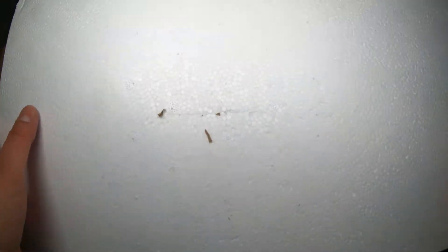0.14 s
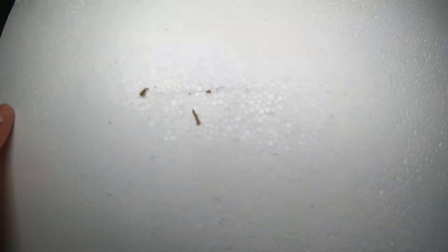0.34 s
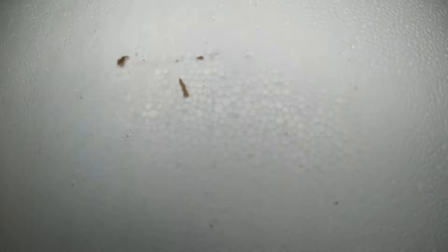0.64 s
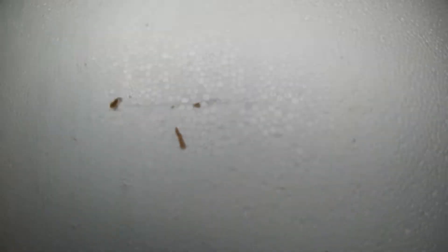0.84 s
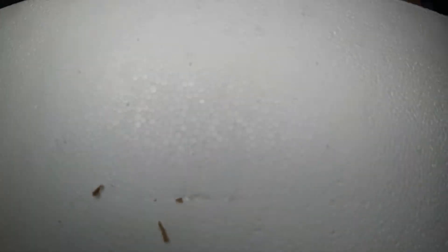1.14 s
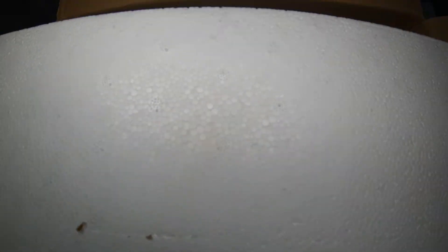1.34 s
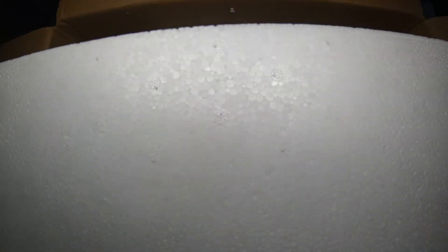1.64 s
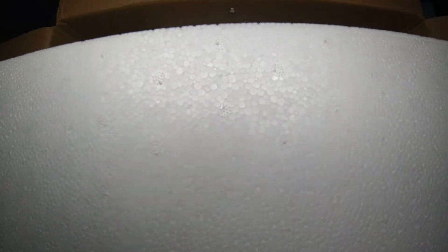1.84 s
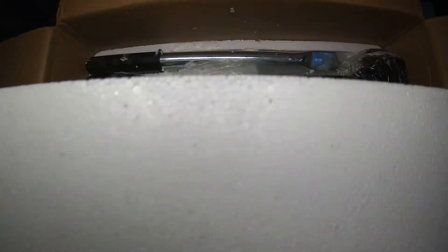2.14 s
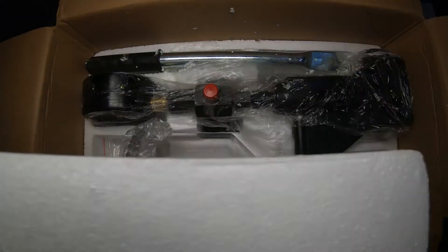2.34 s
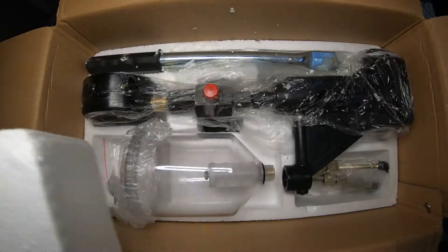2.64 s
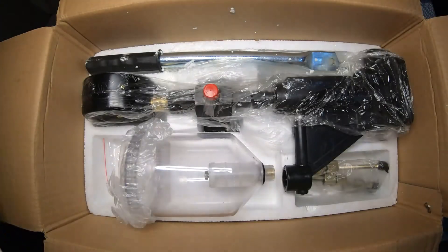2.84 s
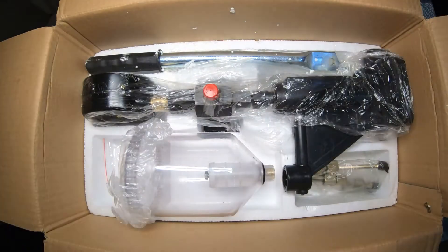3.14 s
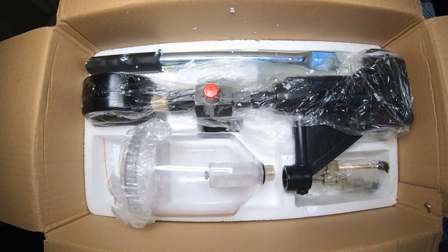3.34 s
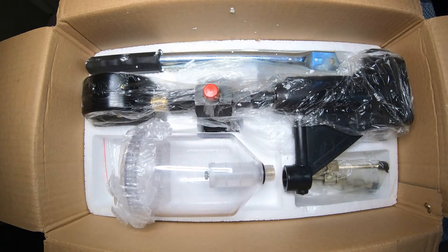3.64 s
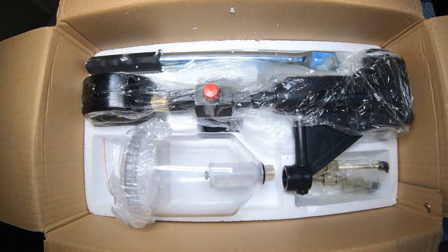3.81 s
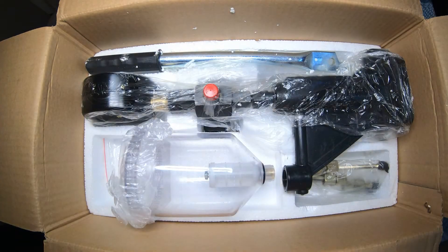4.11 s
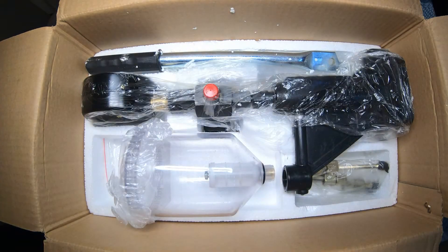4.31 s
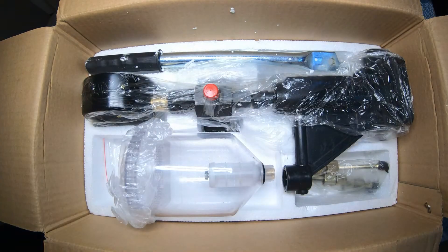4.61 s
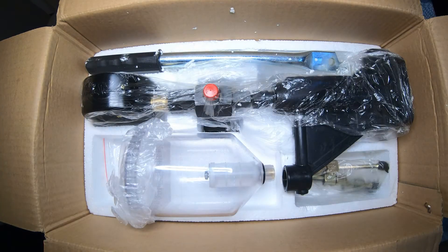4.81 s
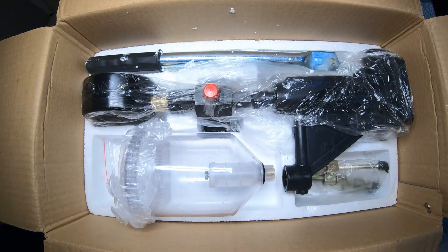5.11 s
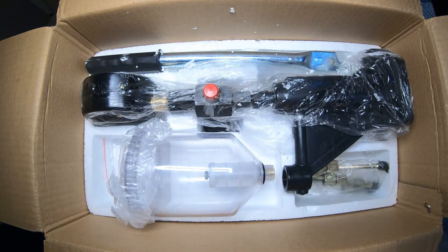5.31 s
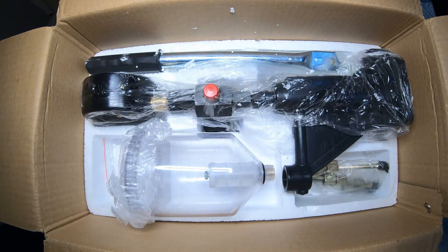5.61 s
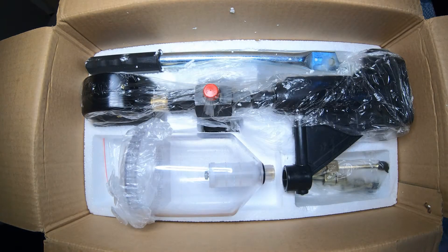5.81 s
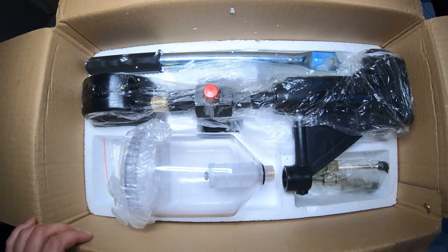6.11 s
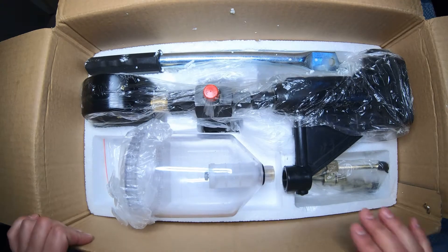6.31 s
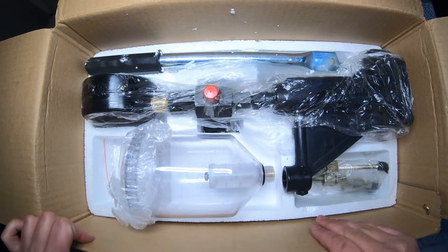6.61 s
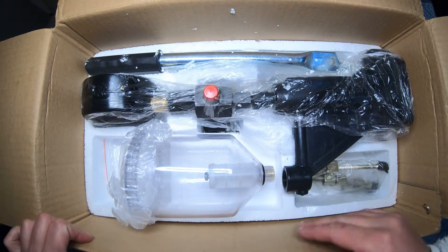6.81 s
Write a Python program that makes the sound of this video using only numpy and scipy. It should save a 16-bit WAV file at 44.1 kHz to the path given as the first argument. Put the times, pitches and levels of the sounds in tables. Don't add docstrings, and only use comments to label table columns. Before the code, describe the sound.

A foam slab squeaks and scrapes out of a cardboard box in crunchy jerks, then slides and bumps into place with hollow box knocks.

```python
import sys
import numpy as np
from scipy import signal
from scipy.fft import rfft, irfft, next_fast_len
from scipy.io import wavfile
from scipy.ndimage import uniform_filter1d, map_coordinates

SR = 44100
rng = np.random.default_rng(int(sys.argv[2]) if len(sys.argv) > 2 else 0)


def generate_wav(sig):
    pcm = np.round(np.clip(np.atleast_2d(sig).T, -1, 1) * 32767).astype(np.int16)
    wavfile.write(sys.argv[1], SR, pcm)


def nominal_scale(level):
    x = np.asarray(level, float) / 20
    return 10 ** x


N = 306495

# (fastest at [s], bead scrape level [dB], swell [s], fade [s], fizz over scrape [dB])
PULLS = [(0, -23, .1, 0.5, -2.5), (0.368, -30, 0.093, 0.1, -3), (0.519, -27, 0.093, 0.057, 4.5),
         (.76, -32.5, 0.92, 0.092, -2), (1.089, -53.5, 0.082, 0.044, -45), (1.154, -40.5, 0.069, 0.088, 1),
         (1.28, -45.5, 0.047, 0.053, -6.5), (1.41, -53, 0.12, .05, -1), (1.473, -31, 0.047, 0.17, -5.5),
         (1.576, -28.5, 0.013, 0.14, -3), (1.657, -22, 0.083, 0.084, -1), (1.756, -31, 0.036, 0.029, 2),
         (2.033, -26, 0.31, 0.14, -1), (2.284, -44, 0.025, 0.012, 4.5), (2.35, -36, 0.021, 0.074, 9.5),
         (2.47, -29, 0.12, 0.13, 2.5), (2.623, -41, 0.012, 0.028, 14), (2.728, -40, 0.069, 0.067, 2.5)]
SLIDES = [(2.984, -40.5, 0.1, 0.06, -6.5), (3.092, -35, 0.077, 0.12, 1), (3.188, -37, 0.049, 0.11, 4),
          (3.29, -34.5, 0.087, 0.39, -3), (3.424, -33, 0.14, 0.35, 6), (3.638, -35, 0.14, 0.29, 15),
          (3.82, -32.5, 0.15, 0.69, -8), (4.085, -29, 0.34, 0.088, 4), (4.224, -36, 0.013, 0.14, 2.5),
          (4.55, -39, 1, 0.39, -8), (4.802, -36, 0.87, 0.24, 1), (4.99, -36.5, 0.017, 0.34, -1.5),
          (5.18, -38.5, 0.24, 0.11, 0.5), (5.31, -29, 0.027, 0.14, -1), (5.52, -46.5, 0.45, 0.15, -11),
          (6.145, -35.5, 0.11, 0.23, 3), (6.3, -49.5, 0.13, 0.31, -13), (6.582, -40.5, 0.13, 0.15, 0.5),
          (6.841, -34.5, 0.055, 0.18, -1)]
STROKE_ROUND, REST_DB = 1.268, -65.5
# (time [s], board over scrape [dB])
BEARING = [(0, -17.5), (.28, -6), (.5, -12), (.8, -4.5), (1.15, -9), (1.35, -0.5), (1.55, 2.5), (1.7, -4),
           (2.35, -6), (2.62, -3.5), (2.95, 3.5), (3.2, 0), (3.64, -4), (4.0, -2.5), (4.35, -0.5),
           (5.2, -4.5), (6.0, -1), (6.95, -3)]
# (time [s], left over right [dB])
PLACE = [(0.0, 0.5), (0.95, 0.5), (0.99, 1.5), (1.72, 1.0), (2.73, 3), (2.9, -5), (3.72, 3.5), (5.4, 2),
         (5.65, -3.5), (5.98, 1), (6.95, 1.5)]
# (time [s], bead level [dB], board over bead [dB], hold [s])
TUGS = [(.451, -27, -8, 0.024), (.59, -23, -10.5, 0.019), (.647, -23.5, -12, 0.014),
        (.688, -32.5, -5.5, 0.027), (.773, -26.5, -22, 0.018), (.797, -33, -5.5, 0.009),
        (1.231, -37.5, -11, 0.0074), (1.4165, -33, 5, 0.0049), (1.4425, -20.5, -22, 0.012),
        (1.943, -22, -9.5, 0.033), (2.03, -35, 6, 0.0045), (2.113, -27, -19, 0.016),
        (2.135, -27.5, -22, 0.025), (2.174, -31, -17, 0.017), (2.265, -35.5, -28, 0.0072),
        (2.3203, -32, -29, 0.015), (2.3371, -32, -26, .002), (2.329, -35, -20, .002),
        (2.3585, -29.5, -20, .003), (2.3805, -21, -10, 0.003), (2.389, -22, -14, .002),
        (2.3955, -20, -13, .002), (2.407, -26, -16, .002), (2.415, -26.5, -11, 0.011),
        (2.445, -26, -16, 0.0028), (2.482, -29, -12, .002), (2.491, -27, 0.5, 0.0078),
        (2.536, -25, -5, 0.01), (2.567, -22, -4.5, 0.0046), (2.6236, -32, -20, .001),
        (2.6407, -30.5, -13, 0.0044), (2.6802, -26.5, -9, 0.019), (2.706, -22, -1, 0.002)]
BUMPS = [(2.8824, -29, 8.5, 0.0028), (2.9144, -20, 0.5, 0.0016), (2.9414, -21, -1, 0.0016),
         (2.9627, -29, 4, 0.0032), (3.087, -32.5, -7.5, 0.024), (3.414, -25, -2, 0.0099),
         (3.459, -20, 4, 0.0037), (3.5052, -23.5, 10.5, 0.0021), (3.656, -38.5, 13, 0.0064),
         (3.744, -29.5, 6.5, 0.0022), (4.008, -22.5, -11, 0.0035), (4.162, -31, 4, 0.0095),
         (4.2155, -31.5, -16, 0.017), (4.249, -29, -6, .004), (4.987, -38, -25, 0.0074),
         (5.2854, -26, 3, 0.013), (5.469, -34.5, -7, 0.0042), (6.0264, -38, 19, 0.0019),
         (6.108, -44.5, 18, 0.0036), (6.233, -33, -2, 0.0085), (6.2523, -28, 0, 0.005),
         (6.52, -36, -0.5, 0.0057), (6.7166, -39.5, -24, 0.0018), (6.8215, -32, -23, 0.0055)]
LET_GO_S, TUG_LINGER, BUMP_LINGER = 0.021, 1.8, 5.5

# (frequency [Hz], density [dB per Hz])
BEAD_SPECTRUM = [(880, -21), (1500, -9.5), (1940, -4.5), (2450, -2.5), (2730, -2.5), (3090, 0), (3670, 0.5),
                 (7000, -4), (9100, -38), (15400, -120)]
# (frequency [Hz], density [dB per Hz])
FIZZ_SPECTRUM = [(2650, -14.5), (4500, -2.5), (5130, -9.5), (5880, -5), (7980, 3.5), (9340, -3),
                 (10200, -0.5), (10900, -4), (13200, -10.5), (15800, -26)]
# (frequency [Hz], density [dB per Hz])
BOARD_SPECTRUM = [(220, -30), (380, -2), (488, -0.5), (636, 0), (1480, 0), (2600, -8), (3380, -9.5),
                  (5720, -120)]
# (frequency [Hz], left-right coherence [0..1])
ALIKE = [(60, 0.96), (180, 0.86), (550, 0.75), (1300, 0.14), (2800, 0.83), (6000, 0.28), (11000, 0)]

# (time [s], walls flexing [dB], panels humming [dB], fade [s])
HEAVES = [(0, -28, -33, 0.22), (.45, -47.5, -41.5, 0.35), (.64, -32.5, -39, 0.099), (.79, -48, -46, 0.07),
          (1.235, -63, -54.5, .15), (1.457, -28.5, -33.5, 0.51), (2.04, -48, -43, 0.11),
          (2.146, -35, -45, 0.043), (2.272, -45, -60, .05), (2.345, -35.5, -45, 0.22),
          (2.49, -31, -41, 0.13), (2.69, -49.5, -43.5, 0.072), (2.953, -67, -36, 0.037),
          (3.116, -63, -41.5, 0.17), (3.425, -38, -35, 0.13), (3.78, -78, -44, 0.52),
          (4.014, -73, -42, 0.088), (4.658, -60, -46, 0.19), (4.91, -58, -32, 0.15),
          (5.312, -30, -32.5, 0.11), (5.364, -30, -34.5, 0.1), (5.6, -56, -48.5, 0.1),
          (6.04, -42, -46.5, 0.067), (6.118, -35, -47, 0.16), (6.262, -43, -33, 0.096),
          (6.535, -34.5, -50.5, 0.17), (6.835, -46, -41, 0.2)]
HEAVE_SWELL_S, WALLS_REST_DB, HUM_REST_DB = 0.037, -74.5, -62
# (frequency [Hz], density [dB per Hz])
WALL_SPECTRUM = [(12, -41.5), (20, -11), (60, -2.5), (115, -5.5), (150, -16.5), (250, -120)]
# (frequency [Hz], density [dB per Hz])
HUM_SPECTRUM = [(105, -39), (147, -3.5), (200, -2.5), (270, -4.5), (330, -6), (420, -10), (560, -45)]
# (time [s], peak level [dB], centre frequency [Hz], t60 [s])
KNOCKS = [(.012, -10, 71, 0.12), (0.636, -20, 65, 0.082), (1.459, -9, 75, 0.11), (1.634, -19, 70, 0.15),
          (1.462, -22, 171, 0.057), (1.629, -6, 199, 0.083), (2.037, -8.5, 201, 0.081),
          (2.324, -22.5, 144, 0.098), (2.401, -21, 143, 0.19), (3.42, -13, 75, 0.055),
          (3.466, -15, 136, 0.052), (3.508, -13.5, 249, 0.092), (3.658, -24, 566, 0.11),
          (3.746, -25, 500, 0.12), (4.011, -15.5, 547, 0.086), (4.216, -18.5, 497, 0.073),
          (4.9, -6, 156, 0.22), (4.899, -14.5, 560, 0.37), (5.285, -18, 296, 0.065), (5.365, -9, 99, 0.038),
          (5.399, -18.5, 690, 0.19), (6.028, -17.5, 480, 0.098), (6.042, -14, 75, 0.086),
          (6.107, -21, 400, 0.095), (6.109, -17, 80, 0.086), (6.256, -6.5, 380, 0.14),
          (6.525, -20.5, 63.5, 0.11), (6.546, -20, 550, 0.052)]
# (frequency [Hz], strength [dB])
PANEL_MODES = [(58, 4), (92, 2.5), (147, 6.5), (190, -2), (268, -2), (310, 0.5), (393, 0.5), (510, 0),
               (545, -3.5), (690, -2), (810, -3.5), (1060, -6.5), (1330, -10.5)]

# (time [s], start frequency [Hz], end frequency [Hz], length [s], level [dB])
RUSTLES = [(.011, 3600, 2790, 0.023, -24.5), (.113, 3500, 3520, .01, -25), (1.44, 2124, 2080, 0.038, -31),
           (1.444, 1730, 1660, 0.016, -29.5), (1.495, 1254, 1320, .04, -34),
           (1.508, 2410, 2370, 0.021, -29.5), (1.56, 2400, 2410, 0.069, -34),
           (1.578, 1205, 1490, 0.047, -31), (1.638, 2350, 2730, 0.07, -35), (2.385, 2790, 3080, .018, -30),
           (2.43, 4750, 4100, 0.11, -33), (2.619, 8200, 8200, .007, -27), (2.62, 10400, 10400, 0.0077, -25),
           (3.079, 582, 570, 0.058, -37), (3.085, 1012, 1013, 0.042, -38), (3.267, 586, 584, 0.033, -38.5),
           (3.583, 5430, 5450, 0.068, -35), (3.862, 397, 386, .04, -38.5), (3.953, 1150, 1150, 0.022, -38),
           (4.049, 1050, 921, 0.089, -35.5), (4.085, 1055, 752, 0.046, -30),
           (4.125, 1190, 1210, .055, -35.5), (4.134, 453, 740, 0.049, -35.5), (4.241, 697, 616, .03, -40),
           (5.4, 717, 690, 0.067, -44)]
# (time [s], frequency [Hz], length [s], level [dB])
CHIRPS = [(0.511, 2250, 0.03, -36), (0.594, 4570, 0.0091, -24), (0.599, 1600, 0.0077, -26.5),
          (0.597, 2430, 0.022, -25.5), (0.646, 1810, 0.018, -25), (0.653, 2375, 0.02, -26),
          (1.62, 3080, 0.073, -32), (2.336, 2880, 0.0092, -27), (2.468, 1374, 0.026, -38),
          (2.529, 3770, 0.017, -31.5), (2.563, 4540, 0.0093, -29), (2.567, 1410, 0.05, -42),
          (4.207, 674, 0.05, -36), (6.248, 1615, 0.013, -30.5)]
CHIRP_DRIFT, RUSTLE_DRIFT = 0.038, 0.0697
# (time [s], frequency [Hz], level [dB])
SQUEAL = [
    (.036, 3260, -41),
    (.045, 3420, -21.5),
    (.058, 4150, -18.5),
    (.075, 4950, -27.5),
    (.12, 5120, -17.5),
    (.127, 4500, -16),
    (.143, 4480, -17),
    (.15, 5100, -15),
    (.226, 5390, -39),
]
SKIPS_S = (.053, .0625, .068, .0755, .087, .1, .119, .1465)
SKIP_WIDTH_S, SKIP_DB = 0.0017, -6
SHARP_S, SHARP_WIDTH_S, SHARP_DB = 0.174, 0.022, -10.5
PLAIN_DB = -28

# (frequency [Hz], density [dB per Hz])
BRUSH_SPECTRUM = [(3200, -33), (3900, -1), (5000, 0), (6000, -40)]
BRUSH_S, BRUSH_DB, BRUSH_WIDTH_S = 0.95, -56.5, .2
# (time [s], frequency [Hz], length [s], level [dB])
THUMPS = [
    (1.462, 110, 0.012, -17),
    (1.493, 110, 0.015, -29),
    (1.541, 110, 0.012, -24),
    (1.629, 119, 0.011, -21),
    (4.908, 151, 0.029, -21.5),
    (5.284, 289, 0.022, -24),
    (5.363, 190, .014, -25.5),
    (5.429, 80, 0.022, -35),
    (5.505, 170, 0.057, -47),
    (5.572, 148, 0.063, -49.5),
]
# (frequency [Hz], density [dB per Hz])
HUSH_SPECTRUM = [(15, -18), (25, -26), (69, -22.5), (91, -24), (188, -7), (457, -11), (762, 11.5),
                 (1050, -52), (2230, -1), (5880, -23), (7700, -15), (15500, -33)]
HUSH_DB = -66.5
# (frequency [Hz], t60 [s])
ROOM_T60 = [(200, 0.17), (2000, 0.33), (10000, 0.014)]
TOP_HZ = 15950


def unit(x):
    return x / np.sqrt(np.mean(x ** 2) + 1e-20)


def along(points, hz):
    f, v = np.transpose(points)
    return np.interp(np.log(hz + 1), np.log(f + 1), v)


def curves(rows):
    s, *cols = np.transpose(rows)
    return [np.interp(np.arange(N) / SR, s, c) for c in cols]


def wobble(rate):
    knots = rng.standard_normal(int(N * rate / SR) + 4)
    return map_coordinates(knots, [np.arange(N) * rate / SR])


def sides(pan_db):
    return nominal_scale(np.multiply.outer([.5, -.5], pan_db))


def swells(at, db, swell, fade, shape):
    t = np.arange(0, N + 64, 64) / SR
    away = np.maximum((at - t) / swell, (t - at) / fade)
    return nominal_scale(db - 20 * away ** shape) ** 2


def summed_db(powers, rest_db):
    total_db = 10 * np.log10(powers.sum(axis=0) + nominal_scale(rest_db) ** 2)
    return np.interp(np.arange(N), 64 * np.arange(len(total_db)), total_db)


def rush(spectrum, spiky_db, patchy_db):
    slips = rng.standard_normal((2, N)) * nominal_scale(spiky_db * wobble(900))
    _, _, z = signal.stft(slips, SR, nperseg=512)
    patches = uniform_filter1d(rng.standard_normal(z.shape[1:]), 3, 0)
    patches = uniform_filter1d(patches, 5, 1)
    pair = signal.istft(z * nominal_scale(patchy_db * unit(patches)), nperseg=512)[1][:, :N]
    size = next_fast_len(N + SR // 10, True)
    hz = np.fft.rfftfreq(size, 1 / SR)
    gain = nominal_scale(along(spectrum, hz)) * np.minimum(hz / spectrum[0][0], 1) ** 6
    turn = np.arccos(np.clip(along(ALIKE, hz), 0, 1)) / 2
    mid, side = irfft(rfft(pair, size) * gain * [np.cos(turn), np.sin(turn)], size)[:, :N]
    return unit(np.array([mid + side, mid - side]))


def drag():
    at, db, swell, fade, fizz_db = np.transpose(PULLS + SLIDES)[..., None]
    powers = swells(at, db, swell, fade, STROKE_ROUND)
    scrape_db = summed_db(powers, REST_DB)
    fizz_over_db = summed_db(powers * nominal_scale(fizz_db) ** 2, REST_DB) - scrape_db
    return scrape_db, fizz_over_db, curves(BEARING)[0]


def jerks():
    beads, board = np.zeros(N + SR), np.zeros(N + SR)
    t = np.arange(SR // 4) / SR
    for rows, linger in ((TUGS, TUG_LINGER), (BUMPS, BUMP_LINGER)):
        for s, db, board_db, hold in rows:
            start = round(s * SR)
            fall_db = -60 * np.maximum(t - hold, 0) / (LET_GO_S + linger * hold)
            beads[start:][:len(t)] += nominal_scale(db - 1.5 + fall_db) * (1 - np.exp(-t / 0.0012))
            board[start:][:len(t)] += nominal_scale(db + board_db + 1.3 * fall_db) * (1 - np.exp(-t / 0.0036))
    return beads[:N], board[:N]


def rubbing():
    scrape_db, fizz_db, board_db = drag()
    pan_db = curves(PLACE)[0] + 1.24 * wobble(16)
    grip_db = 1.1 * wobble(30) + 1.14 * wobble(80)
    jerk, jerk_board = jerks()
    beads = np.hypot(nominal_scale(scrape_db + grip_db), jerk) * sides(pan_db)
    board_level_db = scrape_db + board_db + 0.14 * grip_db + 0.94 * wobble(30)
    board = np.hypot(nominal_scale(board_level_db), jerk_board) * sides(0.79 * pan_db)
    return (beads * rush(BEAD_SPECTRUM, spiky_db=1.0, patchy_db=2.0)
            + beads * nominal_scale(fizz_db) * rush(FIZZ_SPECTRUM, spiky_db=0.5, patchy_db=3.0)
            + board * rush(BOARD_SPECTRUM, spiky_db=1.5, patchy_db=3.5))


def handling():
    at, walls_db, hum_db, fade = np.transpose(HEAVES)[..., None]
    walls_db = summed_db(swells(at, walls_db, HEAVE_SWELL_S, fade, 0.98), WALLS_REST_DB)
    hum_db = summed_db(swells(at, hum_db, HEAVE_SWELL_S, 1.57 * fade, 0.83), HUM_REST_DB)
    walls = unit(nominal_scale(0.86 * wobble(13)) * rush(WALL_SPECTRUM, spiky_db=0.5, patchy_db=2.5))
    hum = unit(nominal_scale(2.5 * wobble(25)) * rush(HUM_SPECTRUM, spiky_db=0, patchy_db=0))
    low = nominal_scale(walls_db) * walls + nominal_scale(hum_db) * hum
    return 0.82 * low + 0.4 * low[::-1]


def knocks():
    out = np.zeros(N + SR)
    t = np.arange(SR // 2) / SR
    modes, strength_db = np.transpose(PANEL_MODES)[..., None]
    for s, db, hz, t60 in KNOCKS:
        scatter_db, detune = rng.standard_normal((2, len(PANEL_MODES), 1)) * [[[1.5]], [[0.042]]]
        octaves = np.log2(modes / hz)
        off_pitch_db = np.maximum(6.1 * octaves, -15 * octaves)
        decay_db = 60 * t * (modes / 150) ** .5 / t60
        level_db = db + strength_db - off_pitch_db + scatter_db - decay_db
        swing = 1 - np.exp(-t * modes / 0.47)
        ring = swing * nominal_scale(level_db) * np.sin(2 * np.pi * modes * (1 + detune) * t)
        out[round(s * SR):][:len(t)] += nominal_scale(-8.5) * ring.sum(axis=0)
    return out[:N]


def chirps():
    out = np.zeros(N + SR)
    rough, drift = nominal_scale(3.2 * wobble(300)), wobble(250)
    tones = [(s, hz, hz, length, db, CHIRP_DRIFT) for s, hz, length, db in CHIRPS]
    tones += [(*row, RUSTLE_DRIFT) for row in RUSTLES]
    for s, hz, end_hz, length, db, scatter in tones:
        at = slice(round(s * SR), round((s + length) * SR))
        glide_hz = np.linspace(hz, end_hz, at.stop - at.start) * (1 + scatter * drift[at])
        phase = 2 * np.pi * np.cumsum(glide_hz) / SR
        swell = np.hanning(len(phase)) ** .5
        out[at] += np.sqrt(2) * nominal_scale(db) * rough[at] * swell * np.sin(phase)
    return out[:N]


def squeal():
    hz, db = curves(SQUEAL)
    t = np.arange(N) / SR
    skips_db = sum(SKIP_DB * np.exp(-((t - s) / SKIP_WIDTH_S) ** 2) for s in SKIPS_S)
    level_db = db + skips_db + 1.5 * wobble(356)
    phase = 2 * np.pi * np.cumsum(hz * (1 + 0.011 * wobble(491))) / SR
    octave = nominal_scale(PLAIN_DB) + nominal_scale(SHARP_DB - 20 * ((t - SHARP_S) / SHARP_WIDTH_S) ** 6)
    on = (t > SQUEAL[0][0]) & (t < SQUEAL[-1][0])
    return on * np.sqrt(2) * nominal_scale(level_db) * (np.sin(phase) + octave * np.sin(2 * phase))


def brush():
    power = swells(BRUSH_S, BRUSH_DB, BRUSH_WIDTH_S, BRUSH_WIDTH_S, 4)
    return nominal_scale(summed_db(power[None], -120)) * rush(BRUSH_SPECTRUM, spiky_db=1, patchy_db=2)


def thumps():
    out = np.zeros(N + SR)
    for s, hz, length, db in THUMPS:
        t = np.arange(round(length * SR)) / SR
        swell = np.hanning(len(t)) ** .5
        out[round(s * SR):][:len(t)] += np.sqrt(2) * nominal_scale(db) * swell * np.sin(2 * np.pi * hz * t)
    return out[:N]


def room(x):
    hz, t, z = signal.stft(rng.standard_normal((2, SR // 2)), SR, nperseg=256)
    decay = nominal_scale(-60 * t / along(ROOM_T60, hz)[:, None])
    tail = signal.istft(z * decay, SR, nperseg=256)[1]
    return signal.fftconvolve(x, tail / np.linalg.norm(tail[0]), axes=1)[:, :N]


def scene():
    tones = sides(1.2)[:, None] * squeal() + sides(2.1)[:, None] * chirps()
    near = rubbing() + tones + handling() + knocks() + thumps()
    echo = nominal_scale(-14.5) * room(near)
    hush = nominal_scale(HUSH_DB - 1.5) * rush(HUSH_SPECTRUM, spiky_db=0, patchy_db=1)
    return near + echo + hush + brush()


def band_limit(x):
    return signal.sosfilt(signal.butter(12, 15950, fs=SR, output="sos"), x)


def record(dry):
    size = next_fast_len(N, True)
    kept = np.fft.rfftfreq(size, 1 / SR) < TOP_HZ
    mix = irfft(rfft(dry, size) * kept, size)[:, :N]
    return band_limit(mix)


dry = scene()
out = record(dry)
generate_wav(out)
```